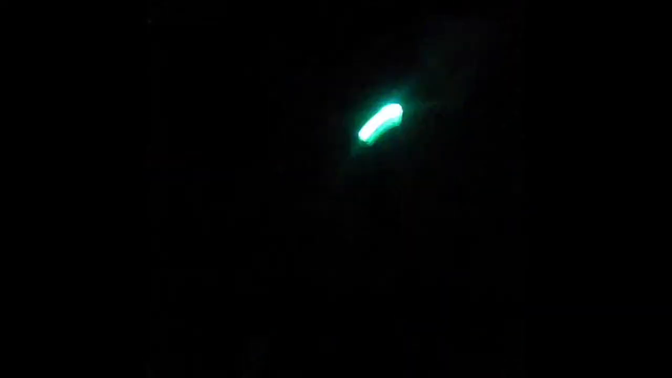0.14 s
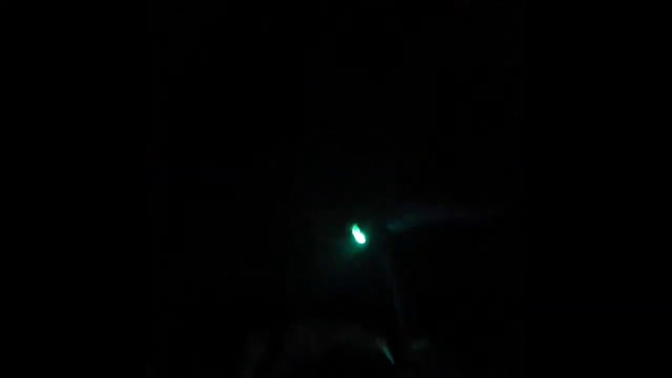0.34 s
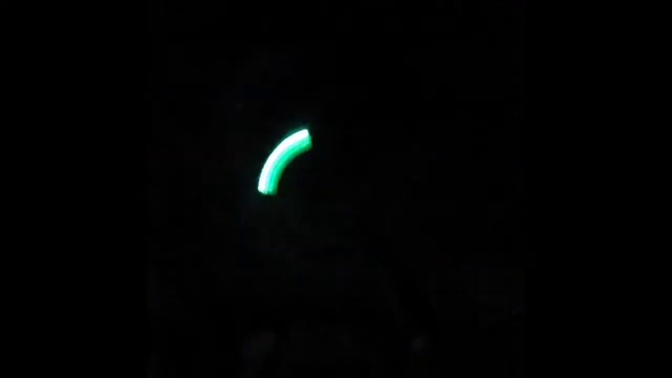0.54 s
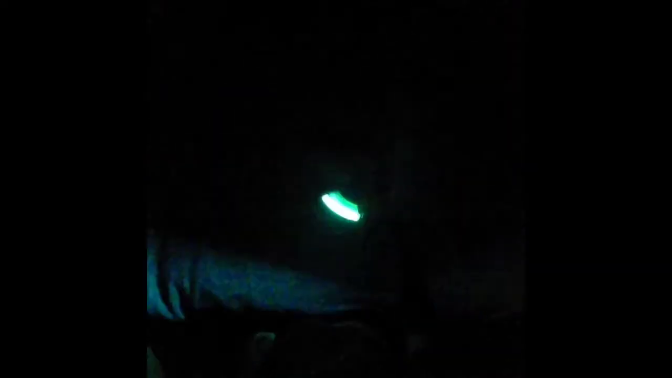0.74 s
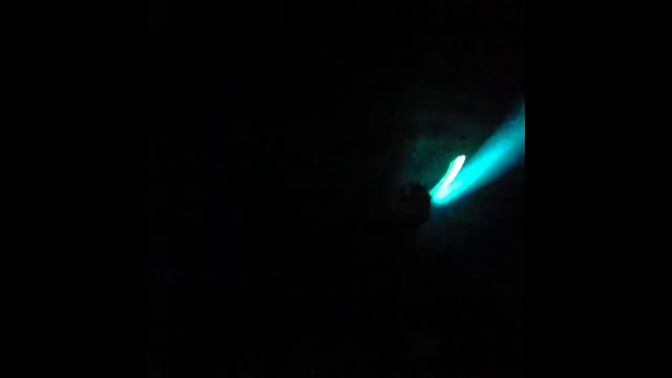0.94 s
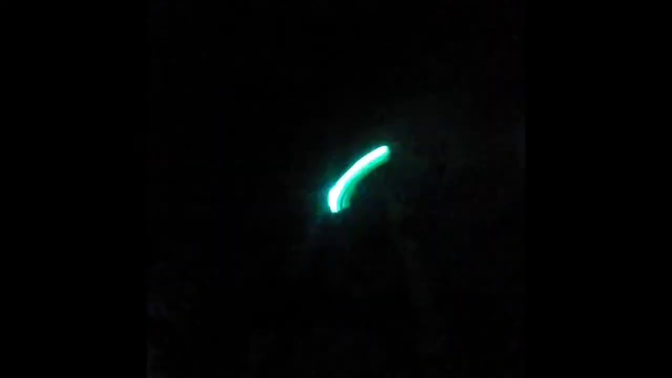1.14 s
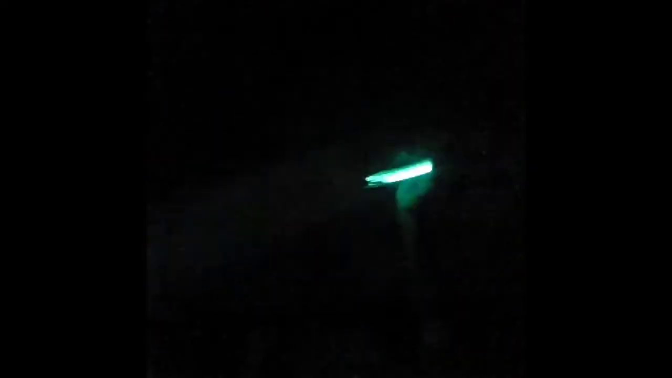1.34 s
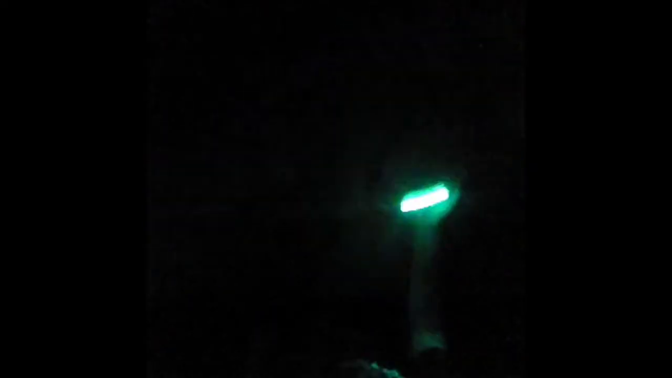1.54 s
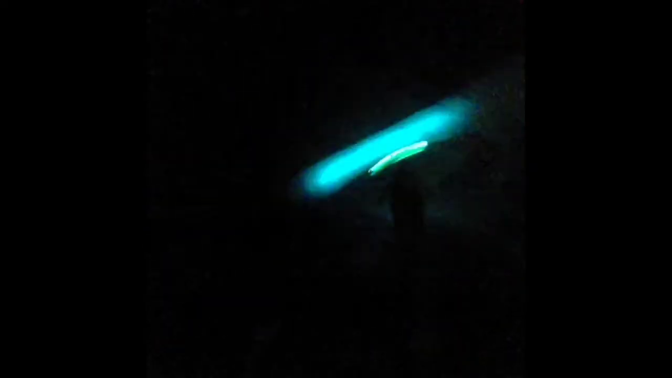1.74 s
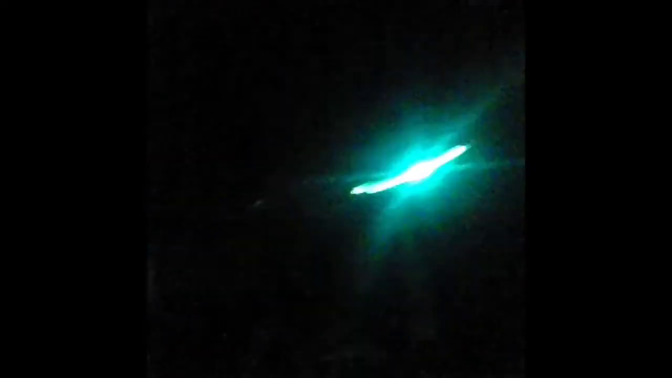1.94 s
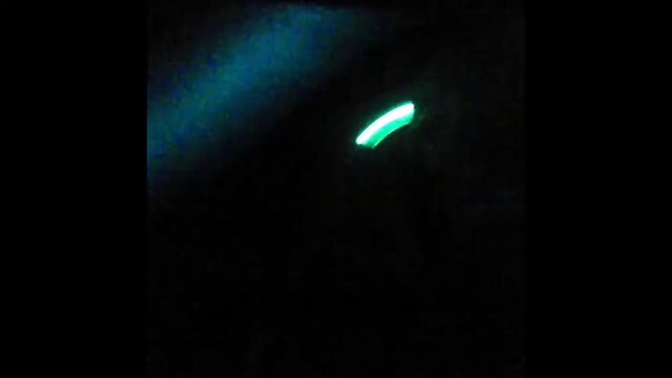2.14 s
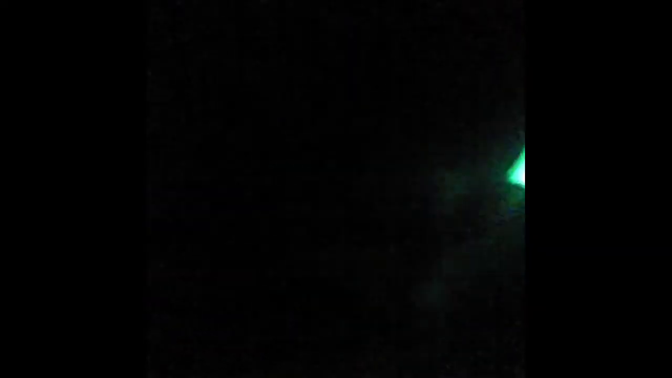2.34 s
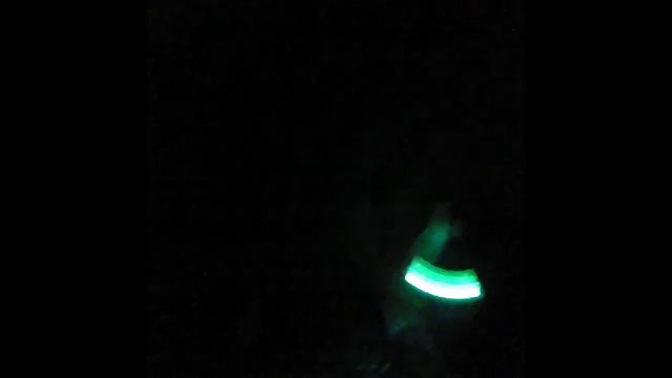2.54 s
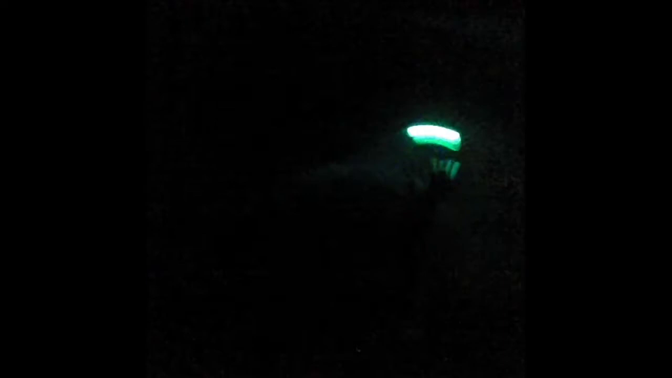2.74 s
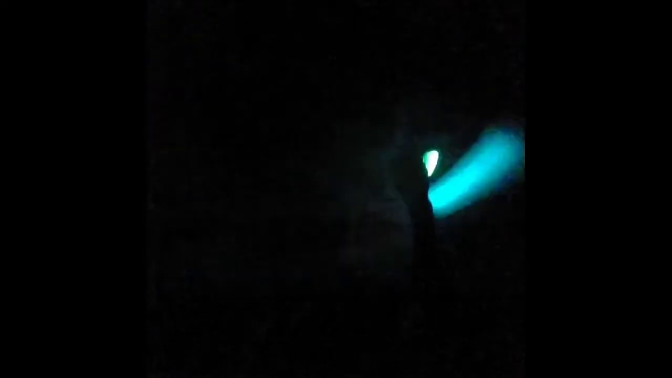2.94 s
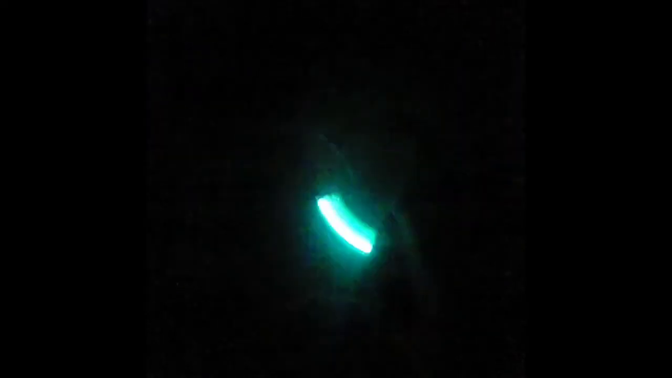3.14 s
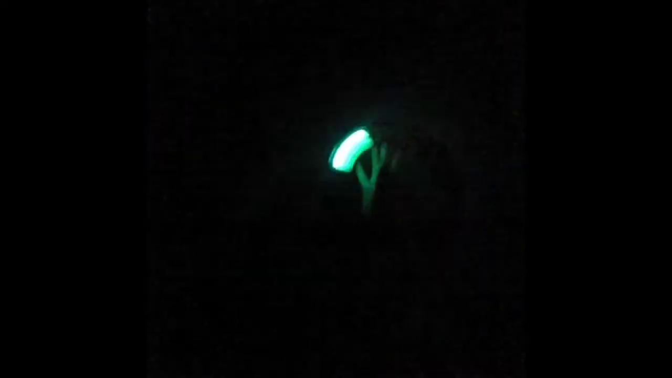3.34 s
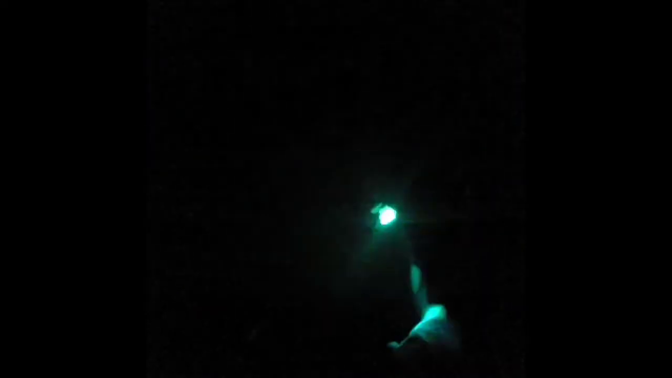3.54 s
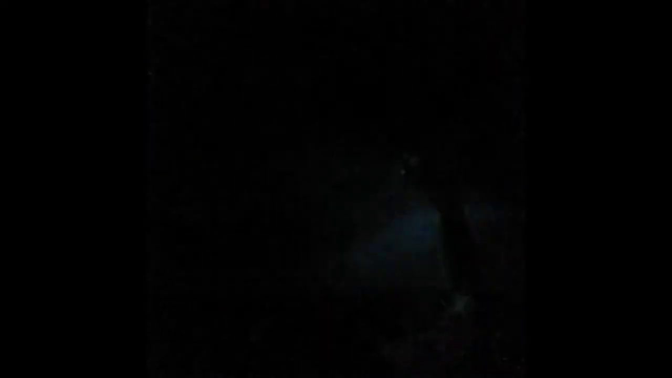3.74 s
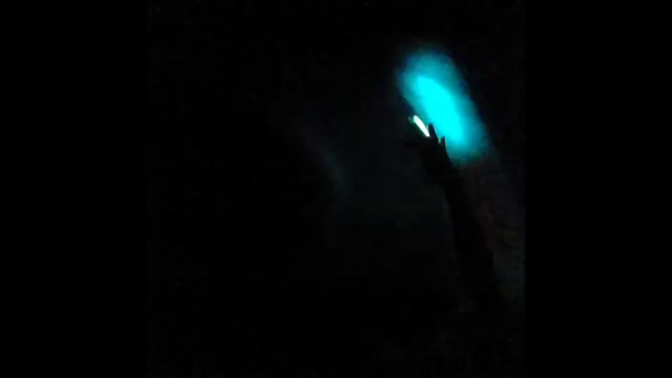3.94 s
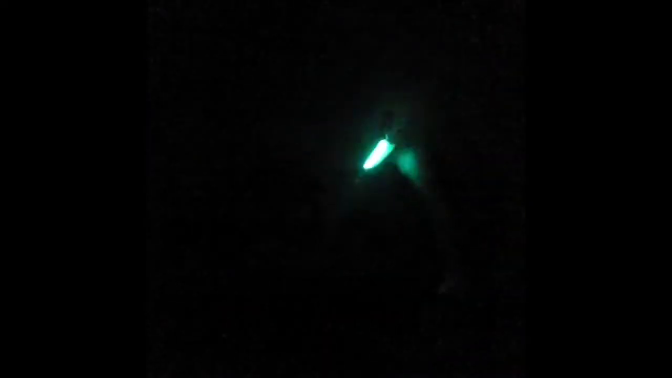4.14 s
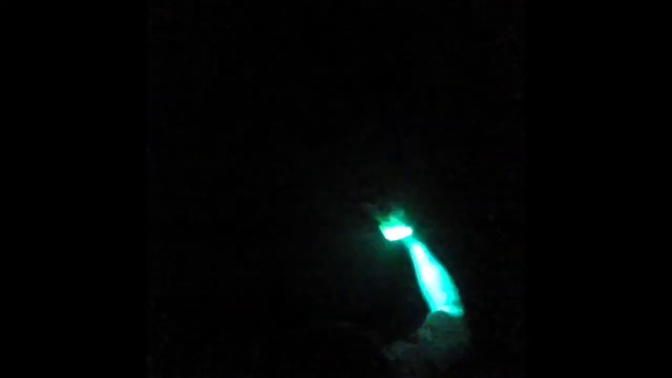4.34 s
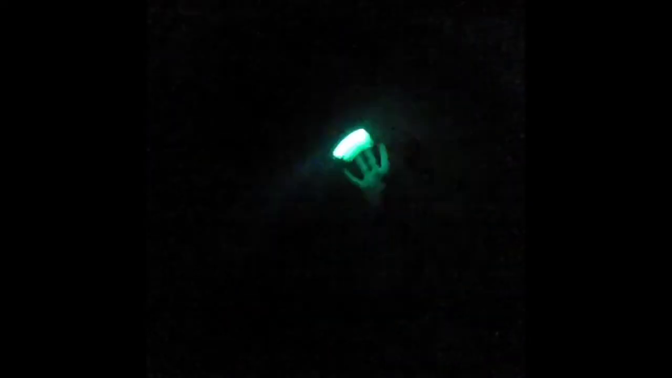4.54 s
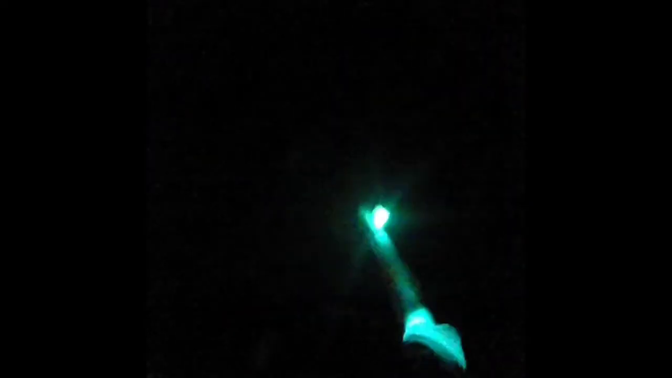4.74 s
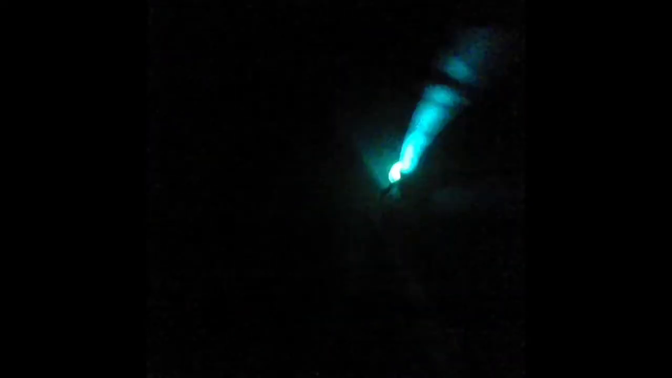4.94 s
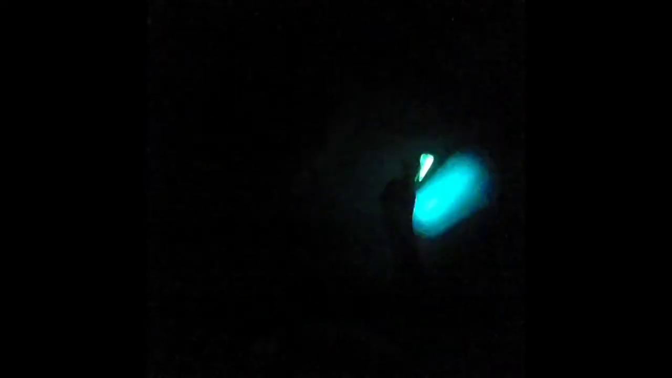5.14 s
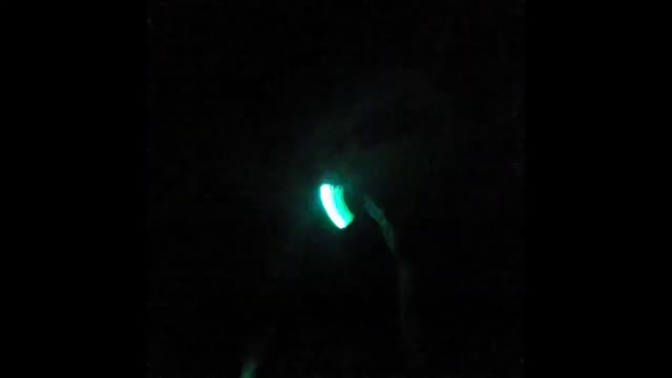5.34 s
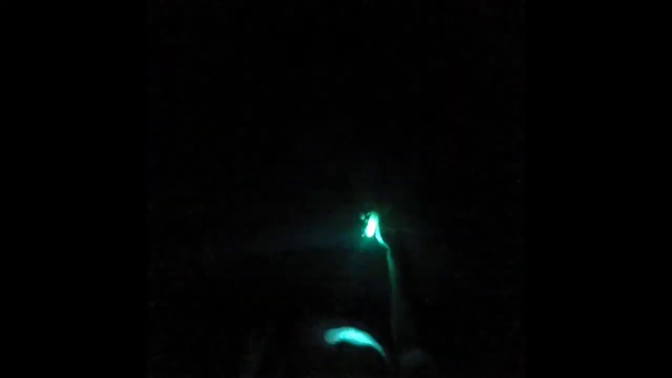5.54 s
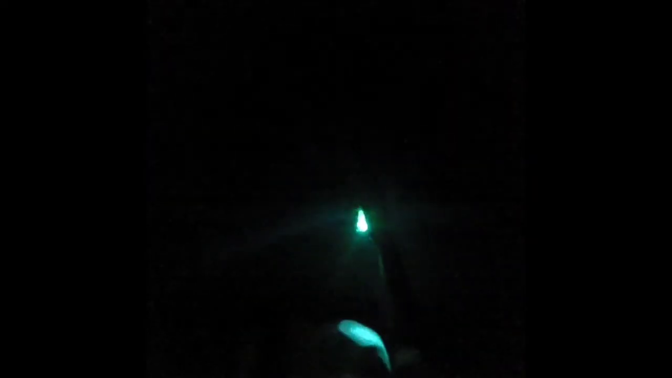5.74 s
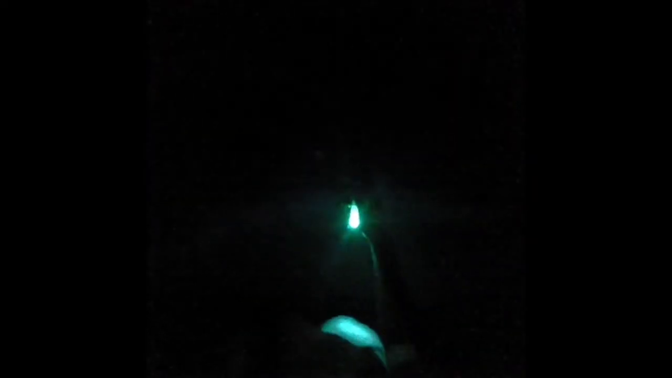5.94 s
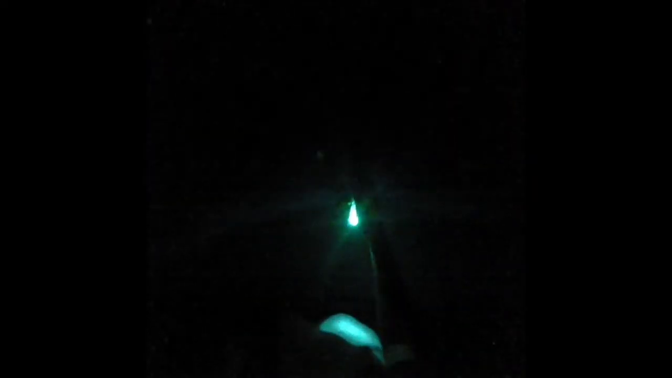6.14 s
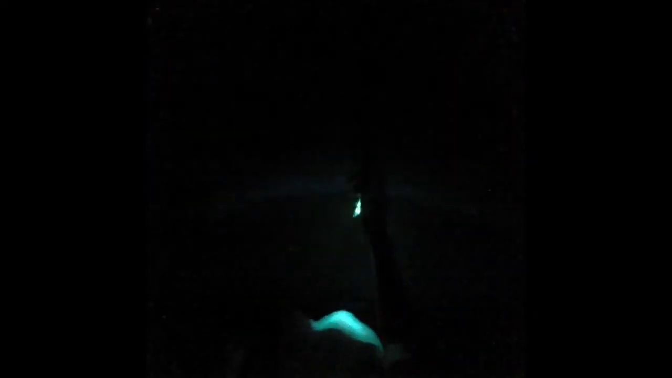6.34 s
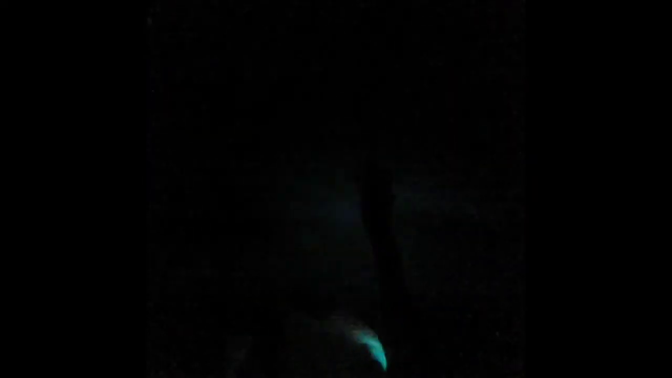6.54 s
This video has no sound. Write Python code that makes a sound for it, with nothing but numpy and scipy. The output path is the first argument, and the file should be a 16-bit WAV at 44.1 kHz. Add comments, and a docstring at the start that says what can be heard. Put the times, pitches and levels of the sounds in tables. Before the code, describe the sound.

Light metal clicks and rattles run unevenly as a hand twirls a butterfly knife, broken by sharp slaps when a handle swings home. The flipping stops with a tight snap, followed by about a second of soft handling bumps and a few closing clicks. The sound is close and fairly dry, in a small room with a low rush of air and a barely audible appliance hum.

```python
"""A small room, one mono microphone close to a hand flipping a butterfly knife.
The two handles swing round and tap or slap the blade and each other: each contact is a sharp crack,
a short ring of steel and the chatter of loose pivots, with a brief answer from the room.
Near the end the handles snap shut, and a few last taps follow. Soft bumps and rustles lie over
the low rush of the room and the faint hum of an appliance."""
import sys
import numpy as np
from scipy import signal
from scipy.fft import rfft, irfft
from scipy.io import wavfile
from scipy.ndimage import uniform_filter1d

SR = 44100
rng = np.random.default_rng(int(sys.argv[2]) if len(sys.argv) > 2 else 0)


def pcm_store(signal):
    """Save signal as 16-bit PCM."""
    levels = np.round(np.clip(np.atleast_2d(signal), -1, 1) * 32767)
    wavfile.write(sys.argv[1], SR, levels.astype(np.int16).T)


N = 295029

# spectrum of the room tone: pitch_hz, density_db
ROOM_TONE = [(25, -7), (60, -16), (95, -19), (130, -4.5), (200, 0.5), (280, -6), (400, -14.5), (800, -16),
             (2000, -20), (4500, -21.5), (7000, -22), (9700, -30.5), (12500, -24.5), (15500, -23)]
# reverberation of the room: pitch_hz, t60_s
ROOM_DECAY = [(300, 0.1), (2000, 0.14), (6000, 0.12), (14000, 0.11)]
# spectrum of a bare metal contact: pitch_hz, density_db
CRACK_COLOUR = [(70, -44.5), (190, -14), (390, -23.5), (520, -16.5), (640, -23), (860, -12), (1120, -20),
                (1650, -6), (3100, -9.5), (4600, -1), (5650, -3.5), (7900, 1), (12300, 4), (15000, -13)]
# how much of a contact's knock_db and treble_db each pitch takes: pitch_hz, share (0-1)
KNOCK_SHARE = [(1800, 1), (4500, 0)]
TREBLE_SHARE = [(8000, 0.017), (11500, 0.92)]
# modes of handles and blade, low to high: pitch_hz, level_db, nominal_t60_s
STEEL_MODES = [(1560, -7, .02), (1780, -7, .02), (2250, -10, .02), (2600, -2, .025), (3750, -6, .02),
               (4165, -4, .11), (4230, -2, .13), (4520, -2, .035), (4740, -1, .03), (4920, -2, .03),
               (5330, -10, .025), (6240, 0, .02), (6500, 0, .02), (7260, -6, .05), (7520, -8, .045),
               (7740, -2, .035), (7900, 1, .06), (8080, -3, .045), (8400, -9, .03), (10130, -8, .06),
               (11150, -6, .035), (11350, -6, .035), (11950, -7, .035), (12170, -6, .035),
               (12620, -4, .055)]
# the freer a handle rings, the lower the mode it favours: ring_db, pitch_hz
FAVOURED_LOW_MODE = [(-2.5, 4740), (3, 4600)]
# a handle taps the blade or its stop in passing:
# start_s, relative_level_db, knock_db, treble_db, ring_db, chatter_db
HANDLE_TAPS = [(0.054, -52, 4, -2, 6, -4), (0.099, -51.5, 6, 3.5, 1, -21), (0.205, -42, 4, -2, 1, -8),
               (0.215, -36, -13, 5, -1, -3), (0.2189, -26.5, -17, -1, 2.5, -19), (0.2934, -38, 10, 7, 7, 7),
               (0.3353, -35.5, -1, -10, -0.5, -18), (0.4269, -37, 5, 0, 3, -1),
               (0.4575, -30, -2, 0, 6.5, -12), (0.508, -38, 5, 2, 4, -25), (0.6099, -45, 8.5, 5, -2, -19),
               (0.6708, -40, -15, -6, 3, 4), (0.7769, -33, 2.5, 4.5, -4, -15), (0.836, -43, 4, -4, -5, -2),
               (0.9937, -45, 8, -2, 8, 8), (1.119, -47.5, 18, 4, 1, 0), (1.1518, -37, 9.5, -7.5, -5, 4),
               (1.208, -45, 7, -9, -2, 4), (1.2473, -36.5, 5, -2.5, -8, 12), (1.384, -47.5, 7.5, -4, -3, 2),
               (1.4737, -34.5, 4, -2, -6, 7), (1.5209, -27.5, -1, -4, -1, 4),
               (1.5825, -41, -1, -4, -0.5, -6), (1.757, -39.5, 6, 2, 0, 12), (1.964, -41, 3, -7, -6, 0),
               (2.0479, -34, 10, 3.5, -5, -3), (2.277, -50, 11, -2, 2, 4), (2.3028, -37, -4, -1, -4, -22),
               (2.3925, -34, 0, 8, -9, -22), (2.4778, -48, 10.5, 5, -1, -1), (2.587, -40.5, 5, 0.5, -2, -4),
               (2.6457, -50, -3, 7, 0, -8), (2.7263, -31.5, -17, 12, -1, -13),
               (2.7894, -29.5, -9, -4, -1, 16), (3.1268, -45, 11.5, -1, 10, -2),
               (3.1652, -38.5, 4.5, 6, 1, 1), (3.2654, -48.5, -6, 4, -1, -11),
               (3.35, -43.5, 1, -10, -1, -10), (3.3608, -41, 4, 5, 2, -8), (3.4047, -31, 5, 2, 2, -4.5),
               (3.5209, -36.5, 10, 0, 2.5, 2), (3.5863, -35, -2, -2, 6, 1), (3.631, -48.5, 14, 10, 8, 1),
               (3.7867, -47.5, 7, -4, 3, -2), (3.8273, -42, 6, -1, -1, 1), (3.8548, -32, 3, -3, -1, 4),
               (3.923, -41.5, -0.5, -9, 1, 5), (4.0119, -47.5, 6, -3, 2, 10), (4.0384, -41, 7, -2, 2, 6),
               (4.086, -38, -1, 0, 7, 3), (4.119, -36.5, 2.5, -4, -3, 14), (4.2549, -32.5, 0, 9, 14, -2),
               (4.2777, -23, -14, 7, -6, 3), (4.3484, -36.5, 4.5, -4, -9, 16),
               (4.507, -30, 6, 7.5, -4.5, -8), (4.5444, -33, -2, -7, -3, -5), (4.6716, -36, 7, 20, 7, 5),
               (4.8226, -41.5, -4, -14, 2, -20), (4.8711, -49.5, 4, -9, -2, -9), (4.903, -45, 8, -2, 3, 8),
               (5.0317, -38, -1, 2, 5, 3), (5.0854, -42, -7, -4, -1, 3), (5.1125, -35.5, -3, -11, 0, 8),
               (5.216, -38, 2, -5, 5, -7), (5.3746, -38.5, -5, 8, 3, -11),
               (6.4768, -57.5, 9, -8, -8.5, -11.5), (6.6002, -49.5, 12, -4, -7, -7),
               (6.638, -28.5, 1, -4, 0.5, 2.5)]
# a swung handle slams home and rebounds: start_s, relative_level_db, knock_db, treble_db,
# high_mode_hz, high_ring_db, chatter_db, rebound_after_s, rebound_db (against the slap)
HANDLE_SLAPS = [(0.248, -13.5, -18.5, -6.5, 7900, -3, -12.5, .004, -18),
                (0.6797, -23, 2.5, 2.5, 11300, 0, -0.5, 0.0039, 3),
                (1.0091, -18.5, 0.5, 3.5, 12620, -2, -3, .0076, 0.5),
                (1.4933, -15, -1.5, 5.5, 12620, -1, -4.5, 0.0071, -5),
                (1.8196, -18, 3, -3.5, 7740, -3.5, 1.5, 0.0086, -10.5),
                (2.77, -26, 3, -1, 8160, -8, 3.5, .0353, -0.5),
                (4.2859, -13.5, -5.5, 2.5, 8010, 1, -8.5, .0092, -2),
                (4.7137, -27.5, 2.5, -6, 11120, -1, -7, .0138, 1.5)]
# soft bumps and rustles: start_s, level_db, centre_hz, width_hz, length_s
SOFT_BUMPS = [(1.009, -57, 450, 398, 0.036), (1.813, -55.5, 230, 132, 0.17), (2.124, -59, 232, 110, 0.096),
              (2.146, -63, 810, 800, 0.11), (2.9, -70.5, 700, 202, 0.086), (4.562, -60.5, 209, 50, 0.095),
              (4.559, -64, 543, 50, .11), (5.721, -69.5, 1647, 705, 0.091), (5.98, -52, 163.7, 60.4, 0.11),
              (6.074, -65.5, 648, 502, 0.064), (6.081, -73, 1713, 398, .1)]
# the handles close, one row: start_s, relative_level_db, knock_db, treble_db,
# low_mode_hz, low_ring_db, high_mode_hz, high_ring_db, chatter_db
CLOSING_SNAP = (5.4227, -14.5, -4.5, -5.5, 6391, -5.5, 12500.5, -21, -18.5)

SIZE = 8192  # samples in one contact
T = np.arange(SIZE) / SR
HZ = np.fft.rfftfreq(SIZE, 1 / SR)
LOW_MODE_COUNT = 13
SLAP_LOW_HZ, FLAT_HZ, TIP_HZ = 4800, 7900, 12200  # favoured by a slap, on the blade's flat, on its tip
GRAZE_LEAD_S = 0.0045


def amp(db):
    """Decibels to gain."""
    return 10 ** (np.asarray(db) / 20)


def unit(x):
    """Scales a sound to energy 1."""
    return x / np.sqrt(np.sum(x ** 2) + 1e-20)


def read(points, hz):
    """Reads a table on a logarithmic frequency axis."""
    pitches, values = np.transpose(points)
    return np.interp(np.log(hz + 1), np.log(pitches + 1), values)


def decay(t60_s):
    """An envelope that falls 60 dB in t60_s."""
    return np.exp(-np.log(1000) * T / t60_s)


def add(mix, start_s, sound):
    """Lays a sound into the mix."""
    part = mix[max(round(start_s * SR), 0):][:len(sound)]
    part += sound[:len(part)]


def through(x, response):
    """Passes a short sound through an impulse response."""
    return signal.fftconvolve(x, response)[:SIZE]


def minimum_phase(spectrum_db):
    """The tightest impulse response with this spectrum."""
    log_gain = np.log(amp(np.r_[spectrum_db, spectrum_db[-2:0:-1]]))
    spectrum = np.exp(np.conj(signal.hilbert(log_gain)))
    return irfft(spectrum[:len(spectrum_db)])


def room_tone(level_db=-64.5):
    """The steady air of the room: a low rush and some hiss."""
    colour = amp(read(ROOM_TONE, np.fft.rfftfreq(N, 1 / SR)))
    rush = irfft(rfft(rng.standard_normal(N)) * colour, N)
    return amp(level_db) * np.sqrt(N) * unit(rush)


def appliance_hum(pitch_hz=293.5, level_db=-74):
    """An appliance holds one faint tone in the background."""
    cycles = pitch_hz * np.arange(N) / SR + rng.random()
    return amp(level_db) * np.sqrt(N) * unit(np.sin(2 * np.pi * cycles))


def contact(chatter_db, bite_s=0.0004, buzz_t60_s=0.016, chatter_t60_s=0.093, bounces_per_s=800):
    """Metal bites and buzzes, then the loose pivots bounce: the force heard close up and by the room."""
    buzz, sign, size = rng.standard_normal((3, SIZE))
    blow = buzz * (1 - np.exp(-T / bite_s)) * decay(buzz_t60_s)
    strength = np.exp(0.82 * np.minimum(size, 2))
    bounces = np.sign(sign) * strength * (rng.random(SIZE) < bounces_per_s / SR)
    chatter = amp(chatter_db) * unit(bounces * decay(chatter_t60_s))
    click = signal.unit_impulse(SIZE)  # out in the room the buzz evens out to one click
    return unit(blow) + chatter, click + chatter


def place_ripple(depth_db=3.4, width_bins=48):
    """Each place of contact stresses some pitches and misses others: a random ripple in dB."""
    rough = rng.standard_normal(len(HZ))
    ripple = uniform_filter1d(uniform_filter1d(rough, width_bins), width_bins)
    return depth_db * ripple / ripple.std()


def room_reflections(gap_s=0.0024, build_s=0.0032, density=0.1):
    """Dense, short reflections off near walls, new for each place of the moving knife."""
    reflections = rfft(rng.choice([-1., 1.], SIZE) * (rng.random(SIZE) < density))
    pitches_hz, t60s = np.transpose(ROOM_DECAY)
    tail = np.zeros(SIZE)
    for share, t60_s in zip(np.eye(len(t60s)), t60s):
        band = read(np.c_[pitches_hz, share], HZ)
        tail += irfft(reflections * band) * decay(t60_s)
    return unit(tail * np.clip((T - gap_s) / build_s, 0, 1))


def pivot_ticks(level_db=-70, until_s=5.35, ticks_per_s=40, place_count=8):
    """While the hand keeps the knife moving, the turning pivots give faint, irregular ticks."""
    moving = np.arange(N) / SR < until_s
    strength = np.exp(0.65 * np.clip(rng.standard_normal(N), -2, 2))
    ticks = strength * (rng.random(N) < ticks_per_s / SR) * moving
    places = rng.integers(0, place_count, N)
    mix = np.zeros(N)
    for place in range(place_count):
        force, _ = contact(chatter_db=-22.5)
        tick = unit(through(force, minimum_phase(read(CRACK_COLOUR, HZ) + place_ripple())))
        echo = unit(through(tick, room_reflections()))
        mix += signal.oaconvolve(ticks * (places == place), tick + echo)[:N]
    return amp(level_db) * np.sqrt(N) * unit(mix)


def steel_ring(force, modes, favoured_hz, favour_db=9, reach_hz=170, grip_detune=0.0038, t60_scale=0.82):
    """The steel rings; where the blow lands favours some modes, and the grip detunes them a little."""
    ring = np.zeros(SIZE)
    for (pitch_hz, level_db, nominal_t60_s), drift in zip(modes, rng.standard_normal(len(modes))):
        radius = np.exp(-np.log(1000) / (nominal_t60_s * t60_scale * SR))
        angle = 2 * np.pi * pitch_hz * (1 + grip_detune * drift) / SR
        mode = signal.lfilter([1, 0, -1], [1, -2 * radius * np.cos(angle), radius ** 2], force)
        favour = np.exp(-((pitch_hz - favoured_hz) / reach_hz) ** 2)
        ring += amp(level_db + favour_db * favour) * unit(mode)
    return unit(ring)


def strike(relative_db, knock_db, treble_db, low_hz, low_db, high_hz, high_db, chatter_db,
           gain_db=23, clank_trim_db=-2.1, tink_trim_db=-1.3, room_db=-1):
    """Steel meets steel close to the microphone: a crack, a hollow clank, a thin tink, then the room."""
    tilt_db = knock_db * read(KNOCK_SHARE, HZ) + treble_db * read(TREBLE_SHARE, HZ)
    colour = minimum_phase(read(CRACK_COLOUR, HZ) + tilt_db + place_ripple())
    paths = []
    for force in contact(chatter_db):
        crack = unit(through(force, colour))
        clank = amp(low_db + clank_trim_db) * steel_ring(force, STEEL_MODES[:LOW_MODE_COUNT], low_hz)
        tink = amp(high_db + tink_trim_db) * steel_ring(force, STEEL_MODES[LOW_MODE_COUNT:], high_hz)
        paths.append(unit(crack + clank + tink))
    direct, radiated = paths
    echo = amp(room_db) * unit(through(radiated, room_reflections()))
    return amp(relative_db + gain_db) * (direct + echo)


def graze(blow_db, knock_db, treble_db, softer_db=20, ring_db=-10, chatter_db=-3):
    """A swinging handle brushes the blade just before it lands: a faint, scratchy touch."""
    ringing = SLAP_LOW_HZ, ring_db, FLAT_HZ, ring_db, chatter_db
    return strike(blow_db - softer_db, knock_db, treble_db, *ringing)


def taps(low_trim_db=-7, high_trim_db=-3, tip_treble_db=5.5, scatter_hz=(60, 170)):
    """Light contacts in passing: a loose grip lets all modes ring, and the brightest land on the tip."""
    mix = np.zeros(N)
    offsets_hz = rng.standard_normal((len(HANDLE_TAPS), 2)) * scatter_hz  # no two land in the same place
    for tap, (low_offset_hz, high_offset_hz) in zip(HANDLE_TAPS, offsets_hz):
        start_s, relative_db, knock_db, treble_db, ring_db, chatter_db = tap
        low_hz = np.interp(ring_db, *np.transpose(FAVOURED_LOW_MODE)) + low_offset_hz
        high_hz = (TIP_HZ if treble_db > tip_treble_db else FLAT_HZ) + high_offset_hz
        ringing = low_hz, ring_db + low_trim_db, high_hz, ring_db + high_trim_db, chatter_db
        add(mix, start_s - GRAZE_LEAD_S, graze(relative_db, knock_db, treble_db))
        add(mix, start_s, strike(relative_db, knock_db, treble_db, *ringing))
    return mix


def slaps(palm_db=-18, knock_shift_db=-5.5, treble_shift_db=3):
    """A full swing ends in a slap and one thinner rebound; the palm stops the low modes."""
    mix = np.zeros(N)
    for start_s, relative_db, knock_db, treble_db, *tink_and_chatter, after_s, rebound_db in HANDLE_SLAPS:
        ringing = SLAP_LOW_HZ, palm_db, *tink_and_chatter
        rebound = relative_db + rebound_db, knock_db + knock_shift_db, treble_db + treble_shift_db
        add(mix, start_s - GRAZE_LEAD_S, graze(relative_db, knock_db, treble_db))
        add(mix, start_s, strike(relative_db, knock_db, treble_db, *ringing))
        add(mix, start_s + after_s, strike(*rebound, *ringing))
    return mix


def bumps(rise_share=0.23):
    """Dull, soft-edged bumps and rustles: bands of noise that swell and fade."""
    mix = np.zeros(N)
    t = np.arange(2 * SIZE) / SR
    hz = np.fft.rfftfreq(len(t), 1 / SR)
    for start_s, level_db, centre_hz, width_hz, length_s in SOFT_BUMPS:
        band = 1 / (1 + (2 * (hz - centre_hz) / width_hz) ** 2)
        noise = irfft(rfft(rng.standard_normal(len(t))) * band)
        age = t / (rise_share * length_s)
        bump = unit(noise * age * np.exp(-age))
        add(mix, start_s, amp(level_db) * np.sqrt(length_s * SR / 2) * bump)
    return mix


def snap_shut():
    """The handles snap together and are held tight, so they ring and chatter little."""
    mix = np.zeros(N)
    start_s, relative_db, knock_db, treble_db, *ringing = CLOSING_SNAP
    add(mix, start_s - GRAZE_LEAD_S / 2, graze(relative_db, knock_db, treble_db))
    add(mix, start_s, strike(relative_db, knock_db, treble_db, *ringing))
    return mix


def scene():
    """The knife close up and the room behind it, at one microphone."""
    knife = slaps() + snap_shut() + taps() + pivot_ticks()
    return (knife + bumps() + room_tone() + appliance_hum())[None]


def record(dry, low_cut_hz=105, high_cut_hz=15400):
    """The loudest peaks are gently rounded off; the small microphone loses the bass, and the very top is cut
    off."""
    rounded = dry / (1 + dry ** 4) ** (1 / 4)
    low_cut = signal.butter(2, low_cut_hz, "highpass", fs=SR, output="sos")
    high_cut = signal.firwin(401, high_cut_hz, window=("kaiser", 8), fs=SR)
    return signal.oaconvolve(signal.sosfilt(low_cut, rounded), high_cut[None], "same")


dry = scene()
out = record(dry)
pcm_store(out)
```